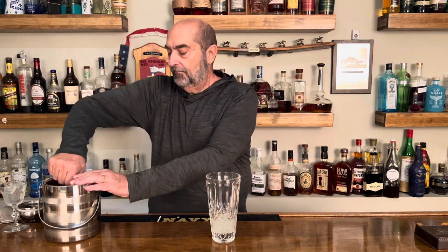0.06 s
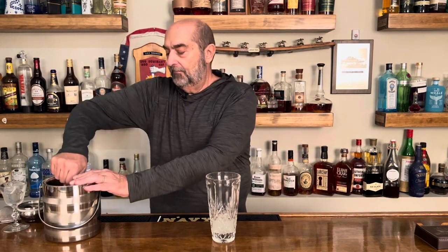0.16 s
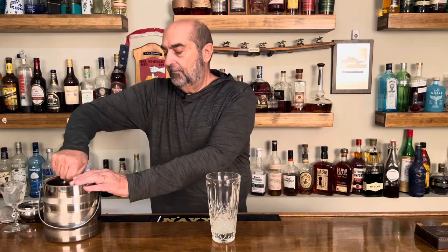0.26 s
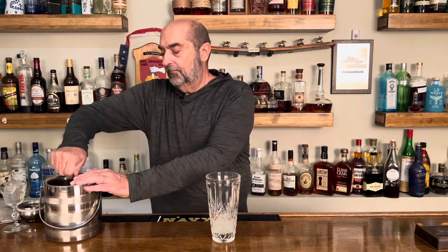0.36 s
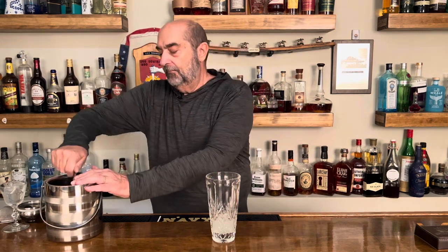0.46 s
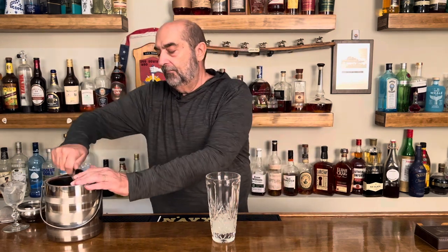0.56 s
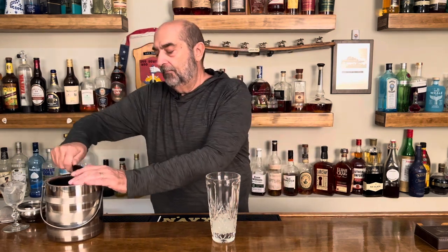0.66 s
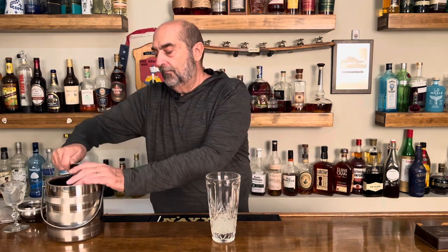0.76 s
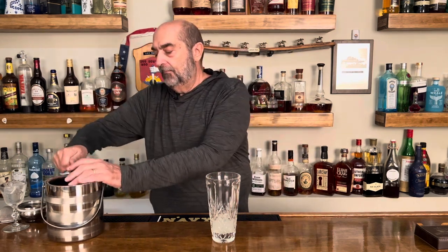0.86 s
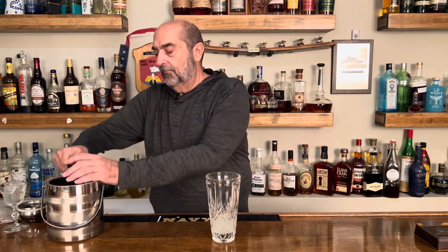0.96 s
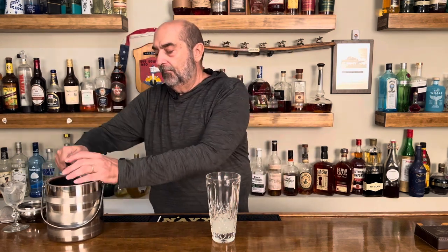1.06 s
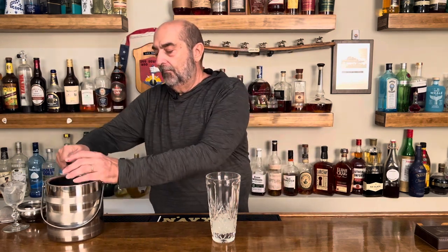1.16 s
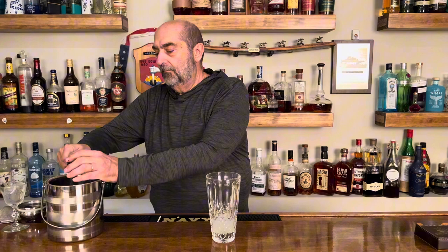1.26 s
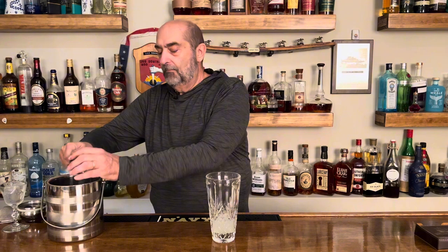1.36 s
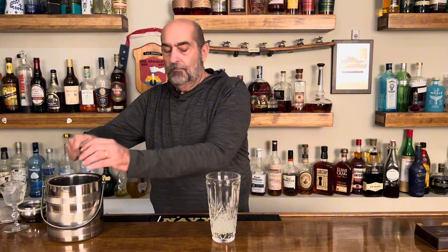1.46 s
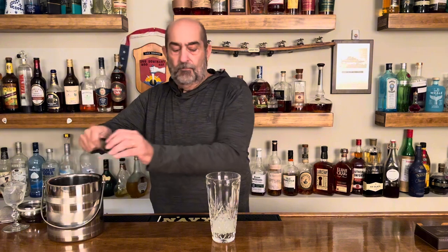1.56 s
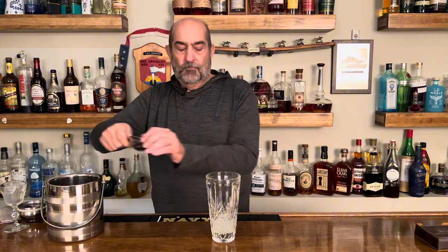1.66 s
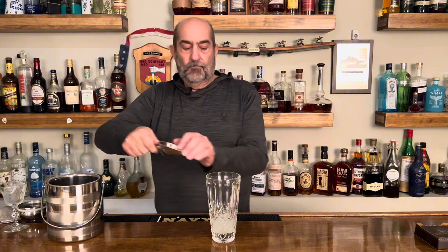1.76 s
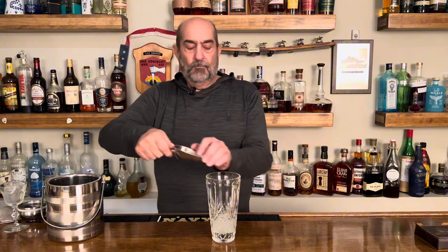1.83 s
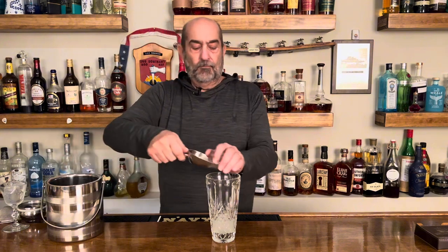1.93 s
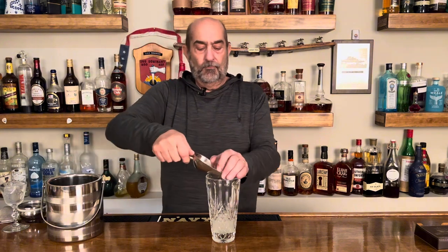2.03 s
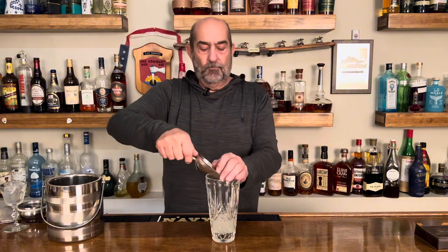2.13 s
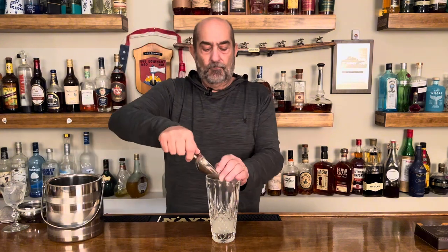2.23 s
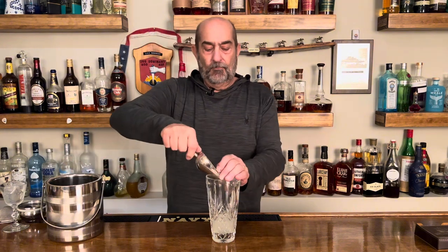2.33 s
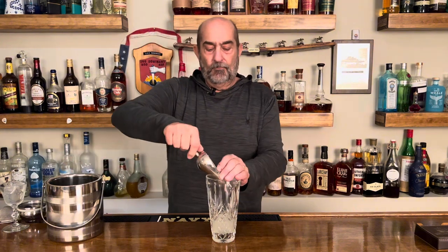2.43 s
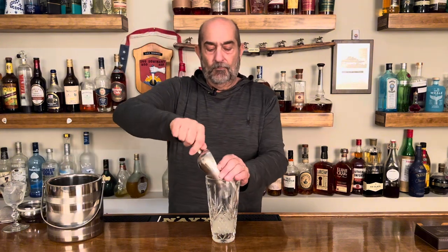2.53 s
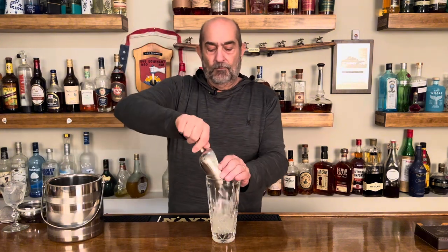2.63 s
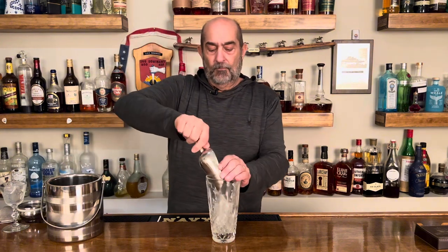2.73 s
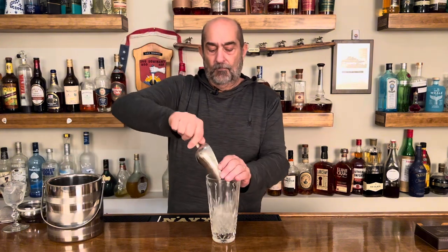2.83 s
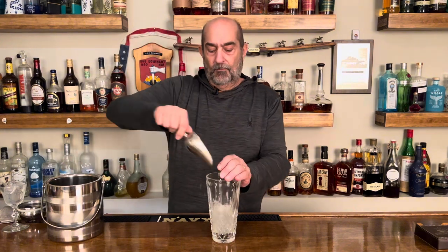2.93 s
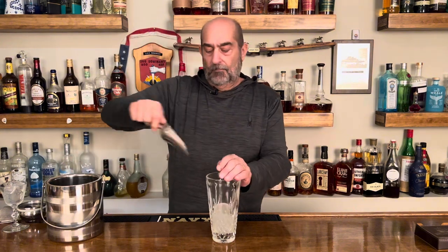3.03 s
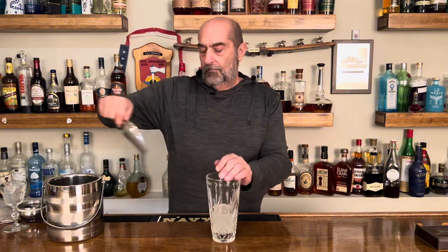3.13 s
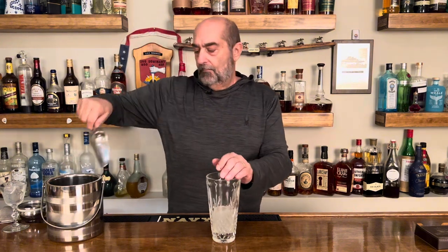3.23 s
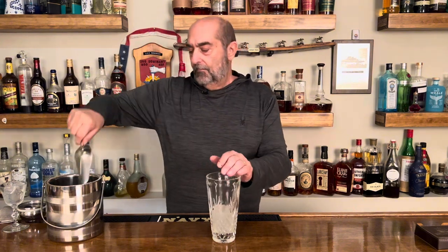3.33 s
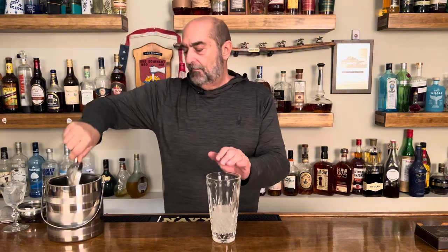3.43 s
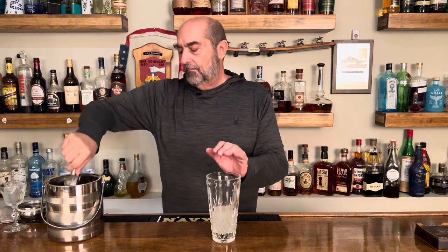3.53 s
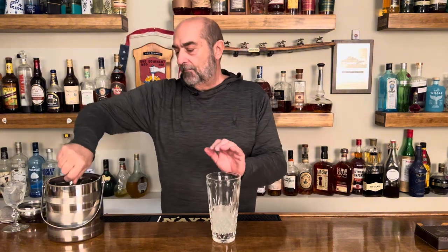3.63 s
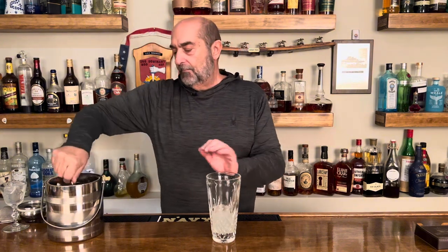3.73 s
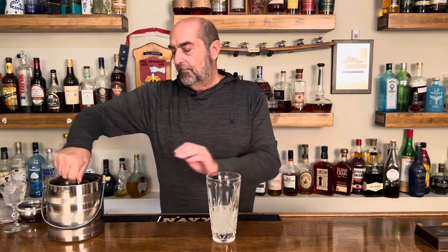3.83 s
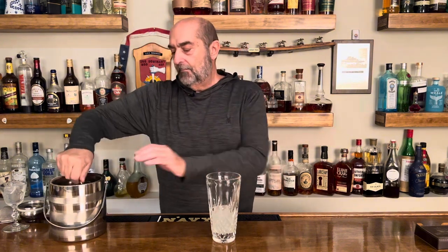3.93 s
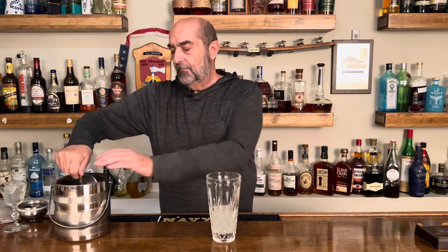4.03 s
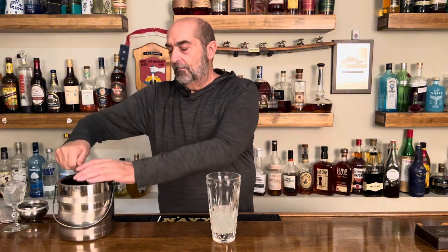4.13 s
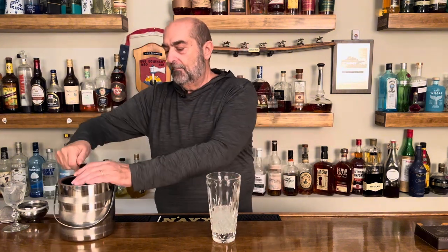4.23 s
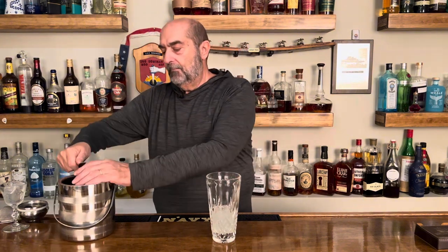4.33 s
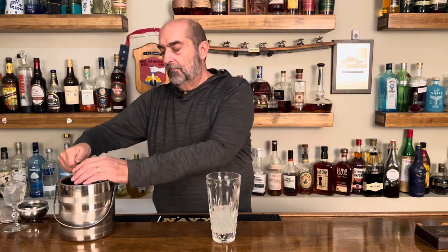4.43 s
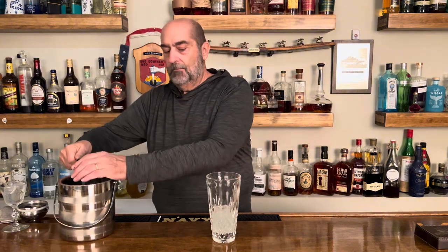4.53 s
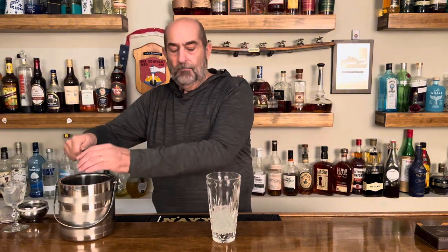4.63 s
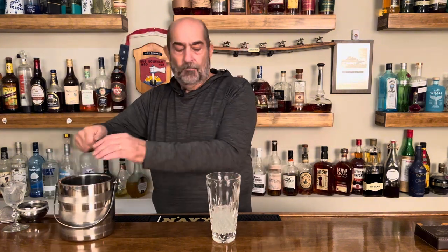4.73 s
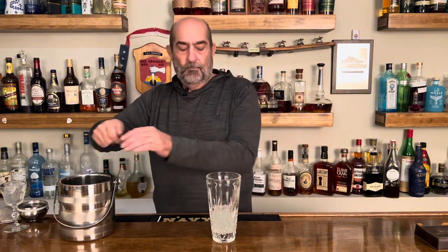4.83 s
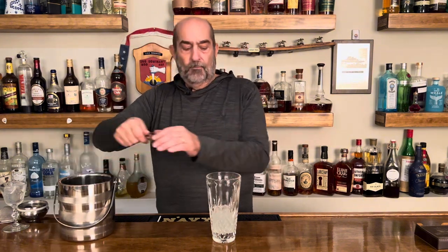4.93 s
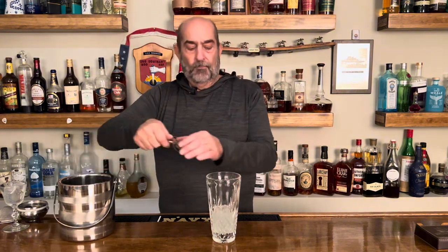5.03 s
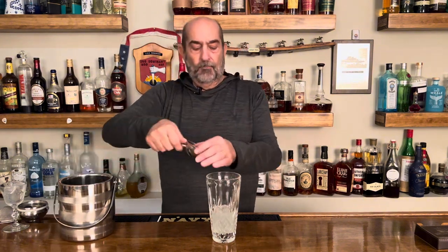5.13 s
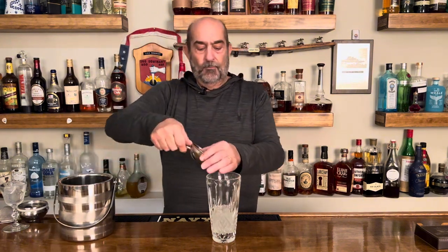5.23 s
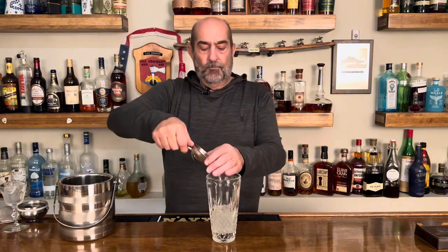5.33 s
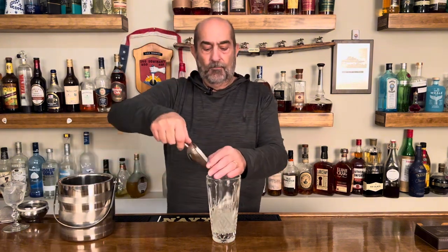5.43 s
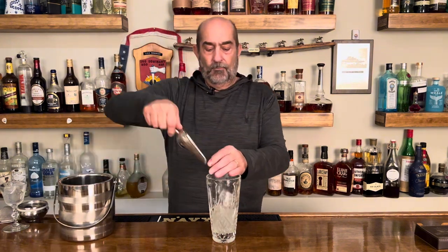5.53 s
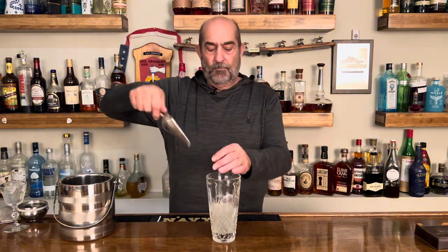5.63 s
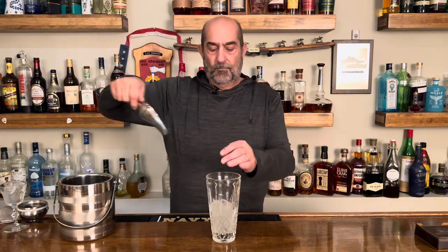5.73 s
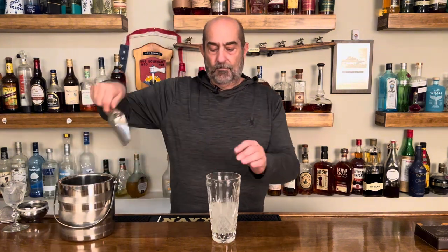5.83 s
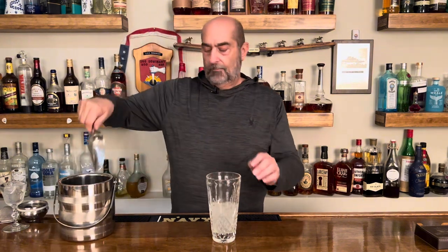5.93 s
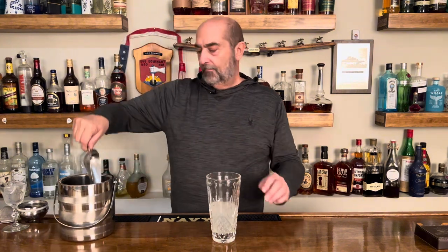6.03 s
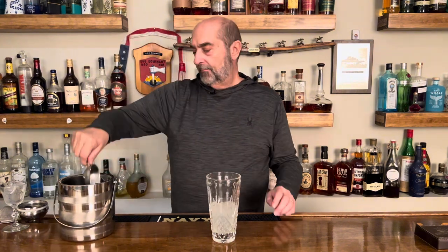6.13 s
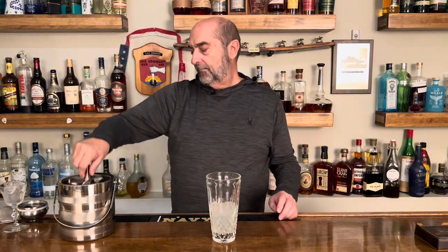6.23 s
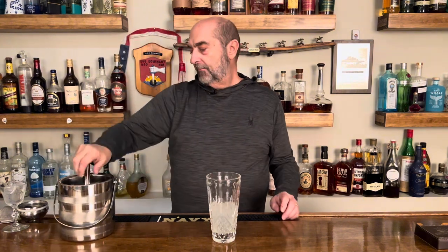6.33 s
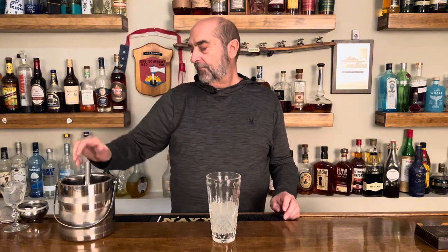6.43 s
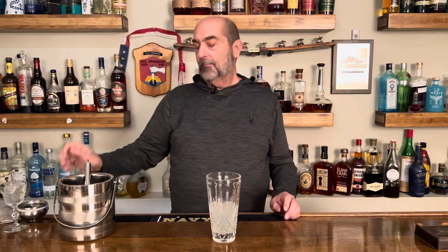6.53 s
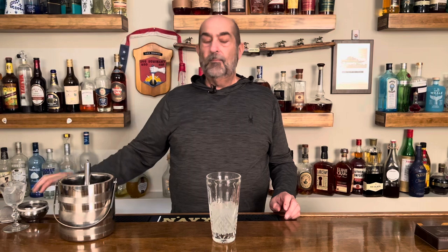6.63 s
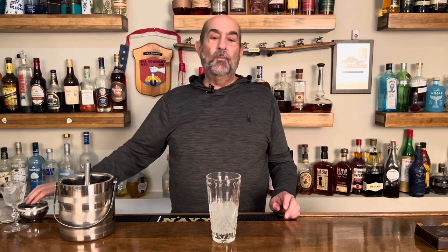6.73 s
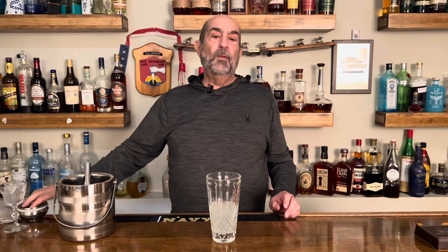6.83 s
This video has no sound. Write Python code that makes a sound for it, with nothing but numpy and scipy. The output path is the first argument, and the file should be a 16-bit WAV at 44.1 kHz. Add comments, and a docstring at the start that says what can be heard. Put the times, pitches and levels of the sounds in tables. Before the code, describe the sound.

A metal scoop digs noisily in ice in a steel bucket on the left, then cubes clink softly into a tall glass near the middle. A longer, louder crunching dig follows, then a second, sharper pour into the glass. Finally the scoop is thrust back into the bucket with loud clanks and a faint steel ring. Close stereo microphones, small lively room, low distant fridge hum.

```python
"""Scooping ice into a glass

A steel scoop digs ice cubes out of a steel bucket on a wooden counter, tips them twice into a tall glass
and is dropped back into the ice. Blows set off noise crashes and fading tones of ice, steel, glass and wood;
moving heaps are many tiny noise puffs, and sleeves brush as shaped noise. Two spaced microphones hear it in
a small lively room, with the bucket to the left and a refrigerator humming far off.
"""
import sys
import numpy as np
from scipy import signal
from scipy.fft import rfft, irfft, next_fast_len
from scipy.io import wavfile
from scipy.ndimage import uniform_filter1d, map_coordinates

SR = 44100
rng = np.random.default_rng(int(sys.argv[2]) if len(sys.argv) > 2 else 0)


def bounce(signal):
    """Save signal as a 16-bit WAV file at the path given by the first command-line argument."""
    frames = np.transpose(np.atleast_2d(signal))
    limited = np.clip(frames, -1, 1)
    pcm = np.round(limited * 32767).astype(np.int16)
    wavfile.write(sys.argv[1], SR, pcm)


N = 303849

# Blows in the bucket: t/s, level/dB, brightness/(dB/octave), short knock f/Hz,
# then relative levels/dB of short knock, weight behind the blow, scoop blade
BUCKET_BLOWS = [(0.0034, -13, -1, 1276, -6.5, 1, -15), (0.033, -39.5, -9, 1320, 4, -4, -14),
                (0.075, -23, -3.5, 1280, -8, -4, -28), (0.098, -24.5, 2, 1890, -7, 1.5, -9.5),
                (0.154, -25.5, -5, 2525, 3, -18, -19), (0.1705, -22, -1, 3580, -10.5, -2.5, -15),
                (0.2494, -35.5, 4.5, 1960, -6, 11, -6), (0.3094, -32, -5, 1320, -4.5, 9.5, -28),
                (0.3436, -29.5, -1, 1120, -21.5, -27, -19), (0.68, -20, 5, 3660, -21, -32, -44.5),
                (0.6848, -14, 1, 1600, -23.5, -27, -35), (1.062, -39, -2, 2000, -29, -23, -42),
                (1.072, -32.5, 2, 5050, -12, -55, -46), (3.3997, -22.5, -0.5, 1583, -21, -9.5, -12),
                (3.4745, -21, -4, 915, -24, 3, -37), (3.497, -18, 1, 1660, -32, 4, -33),
                (3.544, -17.5, -0.5, 1360, -17.5, 3.5, -22), (3.572, -28, 6, 1220, -9.5, -6, -23),
                (3.6047, -13, 2.5, 1133, -11, 6, -9), (3.622, -15, -6, 1503, -1.5, 12.5, -39.5),
                (3.684, -20, 1, 1006, -10, 5.5, -28), (3.7, -20.5, -2.5, 1900, -7, 12.5, -23.5),
                (3.7204, -26.5, 2, 1300, -0.5, -5, -25.5), (3.7558, -25, 0.5, 1241, -1, -21.5, -25.5),
                (3.7908, -18.5, 0, 3400, -17.5, -31, -30), (3.812, -18, 0, 5110, -10, -29.5, -26),
                (3.8294, -15.5, -3, 2040, -11, 1.5, -20), (3.869, -31.5, 2.5, 2040, 6, -6.5, -7),
                (3.886, -34.5, -6.5, 1430, -24.5, 9.5, -14.5), (3.9235, -35.5, -4, 4800, 4, -17, -20.5),
                (3.967, -29, -4.5, 4700, -6, -12.5, -7.5), (3.996, -30.5, -4.5, 715, -1.5, -14, -15),
                (4.0194, -35.5, -6, 2250, 8, -14.5, -6), (4.141, -23.5, -1, 1690, -20, -7.5, -23),
                (4.15, -18, -1, 1720, -14, -6, -24.5), (4.215, -38.5, -5, 3810, 5, -16, -17),
                (4.2534, -31, -1, 2220, -2.5, -7, -17.5), (4.3365, -34, -2, 4800, -6, -22, -4),
                (4.3804, -22.5, 2, 4870, -13, -29, -56), (6.0561, -22, -1.5, 933, -17.5, -11, -22.5),
                (6.1858, -24, 6, 1000, -8.5, 6.5, -11.5), (6.2492, -10.5, 3, 1033, -7.5, 8.5, -26.5),
                (6.2783, -32, -9, 840, -25.5, -1.5, -35.5), (6.3094, -14, -2.5, 850, -2.5, 4.5, -24),
                (6.3325, -11.5, 5, 760, -5.5, -3.5, 2), (6.8159, -45.5, -1.5, 5700, -19.5, -8, -29),
                (6.8703, -28, 1, 1114, 3.5, -1.5, -8.5)]
# Blows on the glass, the scoop set against it, then cubes falling in:
# t/s, level/dB, brightness/(dB/octave), short knock f/Hz,
# then relative levels/dB of short knock, wall ring, middle ring, air column, counter thud
GLASS_BLOWS = [(2.1274, -30, -4.5, 1580, -1.5, -5.5, -10, -5.5, -5),
               (2.1994, -44, -8, 512, 13, 4, -4, -12, -8),
               (2.5027, -46.5, -2, 1850, -11, -8, -14.5, -36, -8),
               (2.5532, -31, -0.5, 3100, -14, 7, -3, -54, -27),
               (2.588, -37, -5.5, 1900, -22, -6, -15, -24, -14),
               (2.6065, -29.5, 10, 1730, -17, 1.5, -7, -33, -18), (2.64, -42, -6, 1587, 6, 9, 1, -31, -18),
               (2.6838, -33, -4.5, 2760, 3.5, -30, -16, -42, -12),
               (2.704, -58.5, 0, 1346, 24, -9, -14, -30, -8),
               (2.7194, -44.5, 5, 1330, 15, -18, -12, -18, -2),
               (2.742, -50.5, 5.5, 1320, 18, -19, -4, -20, -5), (2.757, -58, 4, 578, 27.5, -13, 0, -9, -5),
               (2.7916, -44, 12, 2370, -4, -11, 6.5, -32, -10), (2.8294, -47, 2, 1614, 12, 0, -7, -12, -11),
               (2.85, -48, 8, 1540, 6.5, -14, -16, -18, -11), (2.8968, -43, 5, 1605, -9, -10, -23, 2, -20),
               (3.0156, -52, 6.5, 830, -2, 1.5, -7, 28, -4), (3.0809, -56, -2.5, 1725, 14, 10, 2.5, 11, -6),
               (3.1194, -69.5, -11, 1670, 12, 16, -16, 23.5, 6),
               (5.2619, -41.5, 0.5, 1593, -9, -5, -10.5, -51, -22),
               (5.3435, -29, -1, 4420, -6, 8, -12, -29, -26), (5.3892, -39.5, 9, 2760, -6, 14, -8, -9, -16),
               (5.4301, -19.5, 3, 3890, -12, -6.5, -12, -23.5, -19),
               (5.4694, -21, 6, 1910, -16, -3, -26, -38, -20),
               (5.5099, -27, -2.5, 1070, -31, -2, -2, -32, -10),
               (5.5523, -24.5, 1, 2840, -2, 4, -21, -28, -20), (5.5994, -34, -2, 1994, 6, 0, -20, -32, -9),
               (5.6294, -37, -6, 860, -1, -4, -27, -26, -6), (5.67, -45.5, 3.5, 3190, 7, -6, -18, -30, -8),
               (5.7136, -45.5, -1.5, 2576, 10, 5.5, -14, -33, -9),
               (5.782, -60, -6, 4420, 4, 14, -13, -30, -12),
               (5.8072, -62, 0.5, 2630, 13, 13.5, -12, -26, -15),
               (5.9135, -68, -5.5, 2890, -0.5, 13.5, -12, -25, -15)]
# Faint ticks of shifting cubes: t/s, level/dB, f/Hz
TICKS = [(0.502, -38, 1670), (0.597, -31, 1670), (1.2688, -34.5, 1750), (1.7038, -38, 1800),
         (1.7863, -50, 1660), (1.8602, -42, 1870), (2.0055, -40, 1720), (2.4647, -47, 2500),
         (4.562, -47, 1676), (4.659, -42, 3030), (4.75, -45, 2560), (5.0255, -46.5, 1820),
         (5.209, -41.5, 11500)]
# Shoves of the scoop through the heap: t of the peak/s, crunch level/dB, rumble level/dB (both relative)
STIRS = [(0.005, -20.5, -22), (0.09, -25, -22), (0.185, -24.5, -26), (0.3, -30.5, -33.5),
         (3.574, -23, -19.5), (3.645, -30, -25), (3.73, -18, -37.5), (3.8, -13.5, -43),
         (3.84, -20.5, -42.5), (3.93, -25.5, -32.5), (4.02, -34, -31.5), (4.31, -34, -64.5),
         (6.22, -26.5, -20.5), (6.275, -22.5, -15.5), (6.37, -25, -27.5)]
# Cubes sliding into the glass: t of the peak/s, clatter level/dB, rumble level/dB (both relative)
POURS = [(2.72, -44.5, -44.5), (5.45, -48.5, -49), (5.59, -59.5, -45.5)]
# Sleeves and hands brushing about: t of the peak/s, level/dB
RUSTLE = [(0.45, -62.5), (0.62, -51), (1.306, -62.5), (1.55, -69), (1.67, -68), (1.78, -64.5), (1.872, -76),
          (2.03, -73), (4.766, -65.5), (5.07, -52.5), (5.2, -56), (5.3, -48.5), (6.6, -72.5), (6.76, -78.5)]
# Steel set ringing: t/s, rim level/dB, scoop level/dB, t of the next touch/s
RINGS = [(.685, -47, -70, 1.075), (1.073, -70, -75, 1.6), (3.4, -58, -60, 3.47), (4.15, -60, -70, 4.38),
         (4.38, -63, -70, 5.2), (6.056, -58, -62, 6.19), (6.334, -45, -39, 6.95)]
# Starts of the two pours: t/s
POUR_STARTS = [2.55, 5.34]

# Modes, the tones a body rings at: f/Hz, relative level/dB, t60/s (time to fade by 60 dB if left alone)
# Deep boom of the bucket; its pitch is retuned for every blow
BOOM = [(353, -12, .1), (398, -14, .1), (499, -12, .12), (530, -7, .12), (555, 0, .16)]
# Short bright ring of the bucket's wall
SHELL = [(3660, 1, .05), (3760, 1, .045), (4250, -6, .05), (4790, -1, .06), (5050, -3, .09),
         (5545, -5, .06), (6430, -8, .07), (6853, -9, .09), (7962, -14, .05), (8400, -10, .07)]
# Scoop blade
BLADE = [(714, -7, .3), (1668, -13, .22), (1697, 0, .33), (1950, -11, .2), (3320, -17, .25)]
# Wooden counter
COUNTER = [(89, -19.5, 0.085), (112.8, -7, 1), (149, -0.5, 0.28), (186, 6.5, 0.089), (228.8, 1, 0.17),
           (290, -19.5, 0.04)]
# Glass wall before ice lies in the glass
EMPTY_WALL = [(2218, -14, .15), (2256, 0, .25), (2353, -2, .22), (2446, -5, .16), (2535, -11, .1),
              (2390, 4, .025)]
# Glass wall with ice in it
ICED_WALL = [(2235, -1, .24), (2301, 0, .4), (2352, -9, .15), (2450, -9, .1), (2540, -14, .08)]
# Middle ring of the glass
MIDDLE = [(4795, 0, .1), (4930, -6, .08), (5070, -3, .12)]
# Upper ring of the glass
UPPER = [(5640, -6, .08), (5701, 0, .13), (5749, -1, .13), (5911, -7, .12), (8600, -19, .2),
         (9889, -17, .2)]
# Air column in the glass
AIR = [(515, -16, .12), (655, -12, .15), (684, -7, .3), (690, 0, .07)]
# Free steel rim
RIM = [(908, -22, 3), (1992, -9, .36), (2848, 0, 1.2), (3510, -9, .5), (4100, -7, .7), (5039, -2, .6),
       (5954, -5, .35), (6900, -5, .35), (8333, -6, .3)]
# Standing scoop
HANDLE = [(740, -2, .3), (1694, 5, .4), (1712, 0, .38), (4105, -12, 1.1), (5641, -13, .6), (5652, -9, .7),
          (6110, -7, .35), (6821, -9, .4)]
# Short knock, a brief tone of cube, steel or air column: multiple of the knock's f, relative level/dB, t60/s
SHORT_KNOCK = [(1, 1.5, .075), (.85, -3.5, .05), (1.6, -8.5, .05)]

# Bucket modes that the moving heap keeps ringing: f/Hz, width/Hz, relative level/dB
HEAP = [(1328, 44, 3), (1987, 50, 9), (2300, 20, -9), (2850, 23, -10.5), (3400, 420, 0), (3650, 78, -3.5),
        (4350, 15, -12.5), (4350, 41, -14.5), (4820, 260, -3.5), (5000, 14, -5), (5700, 120, -7.5),
        (6520, 73, -16.5)]
# The same for cubes piling in the glass: f/Hz, width/Hz, relative level/dB
PILE = [(846, 150, -20), (1300, 70, -13.5), (1600, 77, 0), (2030, 49, -2), (2500, 70, -12),
        (3774, 120, -26), (4370, 90, -34), (5100, 120, -11.5), (5500, 38, -32), (5600, 24, -10)]

# Noise colours: f/Hz, relative level/dB
# Crash of a blow in the bucket
CRASH = [(60, -49), (180, -32), (300, -2.5), (1070, -3.5), (1650, 1.5), (2690, -3), (6100, -6.5),
         (9120, -9), (10600, -25.5), (13200, -2), (14600, -16), (16400, -64)]
# Clack of a blow on the glass
CLACK = [(70, -48.5), (180, -5.5), (300, -7.5), (900, -8), (1600, -8.5), (3000, -5), (5800, -15),
         (8800, -20.5), (10600, -41), (12000, -19.5), (14500, -33.5), (16400, -54.5)]
# Crunch of the heap in the bucket
CRUNCH = [(410, -58.5), (700, -2.5), (842, -11.5), (1250, 1.5), (2720, -0.5), (5700, -8.5), (9170, -9),
          (10700, -54), (11600, -9.5), (14400, -21.5), (16400, -68)]
# Clatter of cubes sliding into the glass
CLATTER = [(410, -19.5), (700, -42), (865, 12), (1760, 10.5), (2270, 15), (7040, -45), (8820, -49),
           (10500, -55.5), (11500, -42), (13800, -41), (16400, -68)]
# Low rumble in the bucket
RUMBLE = [(24, -59), (40, -26), (107, -12), (188, -2), (301, -16.5), (446, -7.5), (511, -3), (703, -11.5),
          (1410, -20.5), (1500, -28), (1950, -38.5), (3300, -120)]
# Low rumble in the glass
TUMBLE = [(35, -52), (70, -22.5), (166, 4), (463, -1.5), (512, -23), (845, 1), (1200, -35.5), (1560, -45),
          (2640, -120)]
# Brushing cloth
CLOTH = [(290, -41.5), (500, -25), (1290, -13.5), (1660, -4), (2570, -14), (8750, -32), (10400, -55),
         (11400, -23), (14400, -26), (16400, -49)]
# Quiet background of the room
ROOM_TONE = [(12, -54), (30, -22.5), (55, -6), (114, -10), (236, -17.5), (313, -23.5), (1170, -30.5),
             (1470, -28), (2050, -32), (2230, -39.5), (2500, -40), (9000, -46), (16400, -61)]

# Hand and ice load the bucket wall: t/s, top boom mode f/Hz
BOOM_PITCH = [(0, 500), (.4, 510), (3.47, 550), (3.55, 530), (3.63, 516), (3.68, 565), (3.72, 565),
              (3.83, 520), (4.2, 520), (6.19, 550), (6.25, 555), (6.31, 545)]
# Fingers and ice damp the glass: t/s, extra fading/(dB/s)
GRIP = [(2.65, 90), (2.9, 71.5), (5.3, 7.5), (5.55, 35), (5.7, 75)]
# Ice weighs on the glass: t/s, wall pitch/ratio, upper pitch/ratio
GLASS_SAG = [(5.42, 1, 1), (5.47, .999, .968), (5.56, .998, .985), (5.63, .988, .985), (5.92, .986, .99)]
# Bucket colour between the microphones: f/Hz, left minus right level/dB
BUCKET_SIDE = [(60, -1.5), (150, -3.5), (380, 3.5), (950, 5), (2380, 5.5), (5980, 15.5), (15000, -3)]
# Glass colour between the microphones: f/Hz, left minus right level/dB
GLASS_SIDE = [(60, 1.5), (130, -3.5), (290, 1), (680, 0), (1410, 5), (2300, -1), (3100, 4.5), (6820, 12),
              (15000, 2)]
# Diffuse sound: f/Hz, left-right likeness (1 same, 0 unrelated, -1 opposite)
ALIKE = [(60, 0.9), (130, 0.96), (300, 0.5), (700, -0.42), (3000, -0.0038), (15000, 0.42)]
# Echoes of the room: f/Hz, t60/s
ROOM = [(100, 0.45), (500, 0.34), (2000, 0.27), (6000, 0.33), (14000, 0.065)]
# Stereo width by pitch: f/Hz, side level/dB
WIDTH = [(9000, 0.5), (11500, -0.5), (16000, -14)]

# Weight rings the boom fully and the counter in part; light blows ring the shell more
BOOM_DB, THUD_DB, THUD_SHARE, SHELL_DB, SHELL_SHARE = -7, -20.5, 0.75, -19.5, 0.29
# Upper glass ring under the wall ring, iced and empty; it fades as a pour fills the glass
UPPER_DB, UPPER_EMPTY_DB, UPPER_FADES_DB, FILL_S = -3, -8, 27, 0.48
ICED_S = 3.3  # ice lies in the glass from here on
FINE_DB, FINE_HZ = 2, 50  # strength and spacing of the narrow modes each blow picks out
# Random scatter of mode pitches (share) and levels (dB) from blow to blow and spot to spot
SHELL_SCATTER, HEAP_SCATTER, SPOT_DB = .015, .02, 4
TOP_HZ = 16500


def bucket():
    """Scoop and cubes knock and grind in the steel bucket: the wall, blade and counter ring."""
    def levels(s, weight_db, blade_db):
        thud_db = THUD_DB + THUD_SHARE * weight_db
        shell_db = SHELL_DB - SHELL_SHARE * weight_db
        return [BOOM_DB + weight_db, thud_db, blade_db, shell_db]

    def retuned(s, luck):
        boom_ratio = np.interp(s, *np.transpose(BOOM_PITCH)) / BOOM[-1][0]
        return {0: boom_ratio, 3: 1 + SHELL_SCATTER * luck[-len(SHELL):]}

    hits = blows(BUCKET_BLOWS, CRASH, [BOOM, COUNTER, BLADE, SHELL], levels,
                 crash_db=-12.5, crash_t60=0.21, scatter_db=1.5, lumps_db=3.5, damping=[(0, 50)],
                 pitch=retuned, rise_s=0.0016, contact_db=-3.5, contact_t60=0.013, choke_db=130.5)
    heap = grinding(STIRS, CRUNCH, HEAP, 0.53, RUMBLE, per_s=280, spread_db=9.5,
                    knock_db=-4, knock_hz=2595, rise_db=352.5, fall_db=163)
    return hits + amp(-9.5) * heap


def glass():
    """Scoop and cubes touch the glass: a beating pair of wall tones, higher modes and the air column ring."""
    def levels(s, ring_db, middle_db, air_db, thud_db):
        first, second = POUR_STARTS
        start = first if s < second else second
        filling = np.clip((s - start) / FILL_S, 0, 1)
        fading_db = ring_db - UPPER_FADES_DB * filling
        if s < ICED_S:  # minus infinity silences the wall not in use
            return [ring_db, -np.inf, middle_db, fading_db + UPPER_EMPTY_DB, air_db, thud_db]
        return [-np.inf, ring_db, middle_db, fading_db + UPPER_DB, air_db, thud_db]

    def sagging(s, luck):
        when, wall, upper = np.transpose(GLASS_SAG)
        if s <= when[0]:
            return {}
        return {1: np.interp(s, when, wall), 3: np.interp(s, when, upper)}

    bodies = [EMPTY_WALL, ICED_WALL, MIDDLE, UPPER, AIR, COUNTER]
    clinks = blows(GLASS_BLOWS, CLACK, bodies, levels,
                   crash_db=-10, crash_t60=0.23, scatter_db=2.5, lumps_db=5.0, damping=GRIP,
                   pitch=sagging, rise_s=0.0012, contact_db=6, contact_t60=0.013, choke_db=39.5)
    pile = grinding(POURS, CLATTER, PILE, -9.0, TUMBLE, per_s=150, spread_db=9.5,
                    knock_db=-13.0, knock_hz=1810, rise_db=248, fall_db=133.5)
    return clinks + amp(7.0) * pile


def blows(events, spectrum, bodies, levels, crash_db, crash_t60, scatter_db, lumps_db, damping,
          pitch, rise_s, contact_db, contact_t60, choke_db):
    """Every blow sets off a crash of shaped noise, one short knock and the ring of each body."""
    out, t = np.zeros(N + SR), np.arange(3 * SR // 8) / SR
    crash = coloured(rng.standard_normal(N + SR), spectrum)  # stands for countless short modes
    rings = [ring(body, t) for body in bodies]
    rise = 1 - np.exp(-t / rise_s)
    # the first contact stands out of the crash
    fade = amp(-60 * t / crash_t60) + amp(contact_db - 60 * t / contact_t60)
    gaps = np.diff([row[0] for row in events], append=np.inf)
    chance = rng.standard_normal((len(events), 460))  # each blow's own random numbers
    for gap, luck, (s, db, tilt_db, knock_hz, knock_db, *rest) in zip(gaps, chance, events):
        at = round(s * SR)
        knock = ring(np.array(SHORT_KNOCK) * [knock_hz, 1, 1], t).sum(axis=0)
        lumps = lumps_db * luck[40:120]  # each spot favours other bands
        fine = FINE_DB * luck[120:]

        def colour(hz):
            fine_db = np.interp(hz / FINE_HZ, np.arange(len(fine)), fine) - FINE_DB / 2
            brightness_db = tilt_db * np.log2((hz + 200) / 4000)
            return amp(fine_db + brightness_db + np.interp(hz / 300, np.arange(len(lumps)), lumps))

        for k, ratio in pitch(s, luck).items():  # some bodies are retuned for this blow
            tuned = np.array(bodies[k], float)
            tuned[:, 0] *= ratio
            rings[k] = ring(tuned, t)
        sound = np.zeros(len(t))
        for k, (modes, level_db) in enumerate(zip(rings, levels(s, *rest))):
            scatter = scatter_db * luck[1 + 5 * k:][:len(modes)]
            sound += amp(level_db + scatter) @ modes
        held_db = np.interp(s, *np.transpose(damping)) * t
        choked_db = choke_db * np.maximum(t - gap, 0)  # the next contact chokes what still rings
        sound *= amp(-held_db - choked_db)
        sound += amp(crash_db) * fade * filtered(crash[at:][:len(t)], colour)
        sound += amp(knock_db) * knock
        out[at:][:len(t)] += amp(db) * rise * sound
    return out[:N]


def ring(modes, t):
    """A struck body sounds as several tones that fade freely, one row each."""
    hz, db, t60 = np.transpose(modes)[:, :, None]
    return amp(db - 60 * t / t60) * np.sin(2 * np.pi * hz * t)


def grinding(moves, spectrum, peaks, peaks_db, low, per_s, spread_db, knock_db, knock_hz, rise_db, fall_db):
    """A heap of cubes in motion: crunch, clinks that ring the vessel and loose knocks, with rumble below."""
    crunch = coloured(grains(per_s, spread_db, life_s=0.13), spectrum)
    crunch += amp(peaks_db) * clinking(per_s, peaks, count=3)
    crunch += amp(knock_db) * loose_knocks(150, knock_hz, spread=0.83, cycles=60, spread_db=4.5)
    rumble = coloured(grains(per_s, 9.3, life_s=0.022), low)
    crunch_gain = gains(moves, 1, rise_db, fall_db)
    rumble_gain = gains(moves, 2, rise_db, fall_db)
    return crunch_gain * crunch + rumble_gain * rumble


def clinking(per_s, peaks, count):
    """Small clinks ring the vessel now at one spot, now at another, each with randomly scattered modes."""
    out, knots = np.zeros(N), np.arange(N) * 14 / SR  # 14 new loudness values a second
    hz, width, db = np.transpose(peaks)
    for luck in rng.standard_normal((count, 2, len(peaks))):
        spot = list(zip(hz * (1 + HEAP_SCATTER * luck[0]), width, db + SPOT_DB * luck[1]))

        def vessel(f):
            total = 0
            for k, (centre, w, g) in enumerate(spot):  # neighbouring modes have opposite sign
                total = total + (-1) ** k * amp(g) * 1j * f * w / (centre ** 2 - f * f + 1j * f * w)
            return total

        busy = amp(7 * np.interp(knots, np.arange(100), rng.standard_normal(100)))
        out += unit(filtered(busy * grains(per_s, 8.4, life_s=0.014), vessel))
    return unit(out)


def loose_knocks(per_s, centre_hz, spread, cycles, spread_db):
    """Loose cubes knocking: short damped tones of random pitch, moment and size."""
    when, high, size = rng.random((3, int(per_s * N / SR)))
    hz = centre_hz * np.exp(spread * (2 * high - 1))[:, None]
    t = np.arange(800) / SR
    size_db = -spread_db * np.log(size[:, None] + 0.14)
    tone = amp(size_db - 60 * t * hz / cycles) * np.sin(2 * np.pi * hz * t)
    at = (when * N).astype(int)[:, None] + np.arange(len(t))
    return unit(np.bincount(at.ravel(), tone.ravel(), minlength=N)[:N])  # add up all tones


def grains(per_s, spread_db, life_s):
    """Dense tiny collisions: noise puffs of uneven size at random moments."""
    starts = rng.random(N) < per_s / SR
    hit = starts * amp(spread_db * np.minimum(rng.exponential(size=N), 2))
    t = np.arange(1000) / SR
    return signal.fftconvolve(hit, amp(-60 * t / life_s))[:N] * rng.standard_normal(N)


def rim():
    """The free steel rim and scoop swell and sing on until hand or ice touches them."""
    out, t = np.zeros(N + 2 * SR), np.arange(SR) / SR
    modes = ring(RIM + HANDLE, t)
    for s, rim_db, scoop_db, stop_s in RINGS:
        swell = 1 - np.exp(-t / 0.075)
        touched = amp(-900 * np.maximum(t - (stop_s - s), 0))
        level_db = np.repeat([rim_db, scoop_db], [len(RIM), len(HANDLE)])
        song = amp(level_db + rng.standard_normal(len(modes))) @ modes
        out[round(s * SR):][:len(t)] += swell * touched * song
    return out[:N]


def handling():
    """Cubes on the carried scoop tick as short pitched noise, and cloth brushes as dense noise puffs."""
    out, t = np.zeros(N + SR), np.arange(SR // 20) / SR
    for s, db, hz in TICKS:
        band = lambda f: 1j * f * hz * 0.22 / (hz ** 2 - f * f + 1j * f * hz * 0.5)
        puff = amp(db - 60 * t / 0.047) * rng.standard_normal(len(t))
        out[round(s * SR):][:len(t)] += filtered(puff, band)
    cloth = coloured(grains(1800, 1.2, life_s=0.016), CLOTH)
    return out[:N] + gains(RUSTLE, column=1, rise_db=138.0, fall_db=158.5) * cloth


def placed(x, lead_s, balance):
    """The left microphone hears the source lead_s earlier and with its own colour."""
    side = np.array([[.5], [-.5]])  # half of each difference to left and right
    return filtered(x, lambda hz: amp(side * along(balance, hz)) * np.exp(2j * np.pi * hz * side * lead_s))


def room(x, step=SR // 2):
    """Each pitch of the echo dies at its own speed; the echo is drawn anew from noise every half second."""
    out = np.zeros((2, N + 2 * SR))
    for at in range(0, N, step):
        hz, t, z = signal.stft(rng.standard_normal((2, SR // 2)), SR, nperseg=256)
        fading = amp(-60 * t / along(ROOM, hz)[:, None])
        tail = signal.istft(z * fading, SR, nperseg=256)[1]
        wet = signal.fftconvolve(x[None, at:at + step], tail / np.linalg.norm(tail[0]), axes=1)
        out[:, at + 150:][:, :wet.shape[1]] += wet  # the first wall answers a few ms late
    return diffuse(out[:, :N])


def room_tone():
    """Distant refrigerator and house rumble: shaped noise around a slightly unsteady hum."""
    t = np.arange(N) / SR
    waver = map_coordinates(rng.standard_normal(N * 8 // SR + 4), [t * 8])  # 8 random values a second
    hum = amp(-57.5 + 2 * waver) * np.sin(2 * np.pi * 119 * t)
    rumble = diffuse(coloured(rng.standard_normal((2, N)), ROOM_TONE))
    return hum + amp(-58.5) * rumble


def diffuse(pair):
    """Sound from all around: mix two unrelated signals to the left-right likeness set for each pitch."""
    def share(hz):
        turn = np.arccos(np.clip(along(ALIKE, hz), -1, 1)) / 2
        return np.array([np.cos(turn), np.sin(turn)])

    mid, side = filtered(pair, share)
    return np.array([mid + side, mid - side])


def amp(db):
    """Decibels to gain."""
    return 10 ** (np.asarray(db) / 20)


def unit(x):
    """Scale to an rms (average strength) of 1."""
    return x / np.sqrt(np.mean(x ** 2) + 1e-20)


def along(points, hz):
    """Read values between (f/Hz, value) points on a log axis."""
    f, v = np.transpose(points)
    return np.interp(np.log(hz + 1), np.log(f + 1), v)


def gains(rows, column, rise_db, fall_db):
    """Gain per sample of movements that swell and die away by so many dB a second."""
    late = np.arange(N) / SR - np.array(rows)[:, :1]
    slope_db = np.minimum(rise_db * late, -fall_db * late)
    level_db = np.array(rows)[:, column, None] + slope_db
    return uniform_filter1d(amp(level_db.max(axis=0)), size=400)  # the loudest movement wins, smoothed


def filtered(x, response):
    """Change each frequency of x by a (complex) response."""
    m = next_fast_len(x.shape[-1] + 8192)
    return irfft(rfft(x, m) * response(np.fft.rfftfreq(m, 1 / SR)), m)[..., :x.shape[-1]]


def coloured(x, spectrum):
    """x shaped by a noise colour, rms 1."""
    return unit(filtered(x, lambda hz: amp(along(spectrum, hz))))


def scene():
    """Bucket to the left, glass near the middle and closer, both in the room."""
    left, centre, song = bucket(), glass() + handling(), rim()
    direct = placed(left, lead_s=0.00018, balance=BUCKET_SIDE)
    direct += placed(centre, lead_s=.00005, balance=GLASS_SIDE)
    direct += placed(song, lead_s=.00004, balance=BUCKET_SIDE)
    return direct + room(amp(-3.0) * left + amp(-4.0) * centre) + room_tone()


def record(dry):
    """Deep bass is weak, stereo width is set by pitch, loud peaks are rounded off, the top is cut off."""
    x = filtered(dry, lambda hz: 1 / np.sqrt(1 + (48 / (hz + 1)) ** 6))
    mid = x.mean(axis=0)
    side = filtered((x[0] - x[1]) / 2, lambda hz: amp(along(WIDTH, hz)))
    x = np.array([mid + side, mid - side])
    x = x / (1 + np.abs(x / .9) ** 4) ** (1 / 4)
    return filtered(x, lambda hz: hz < TOP_HZ)


dry = scene()
out = record(dry)
bounce(out)
```